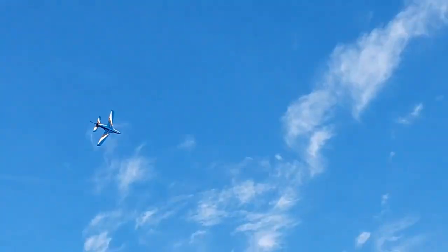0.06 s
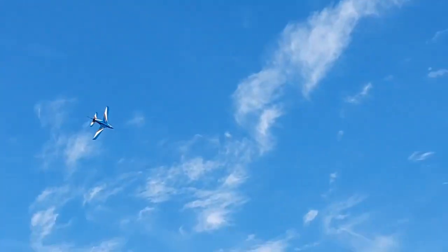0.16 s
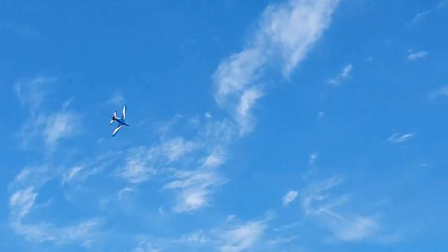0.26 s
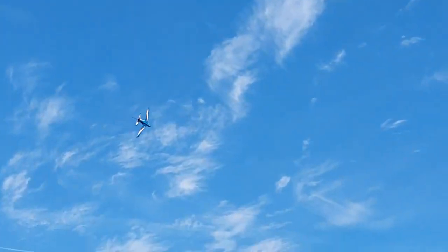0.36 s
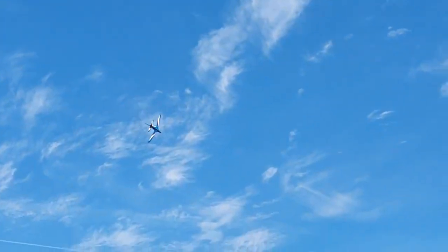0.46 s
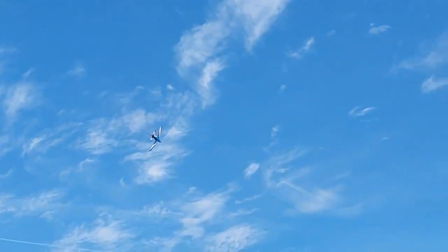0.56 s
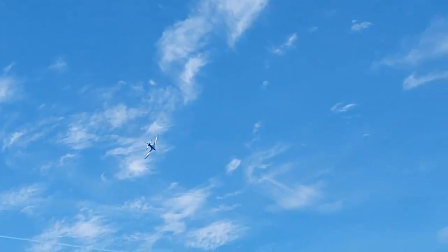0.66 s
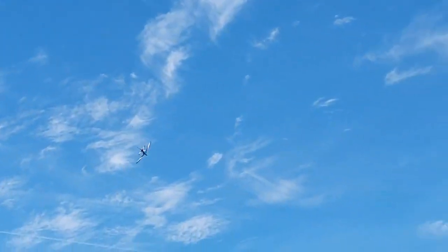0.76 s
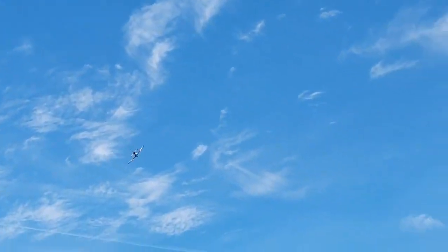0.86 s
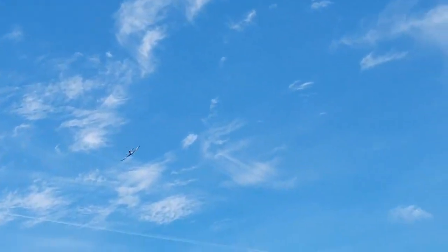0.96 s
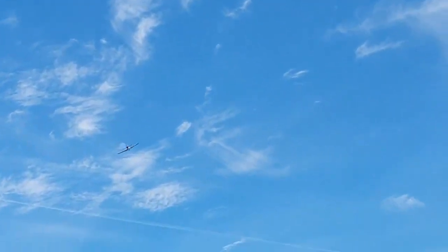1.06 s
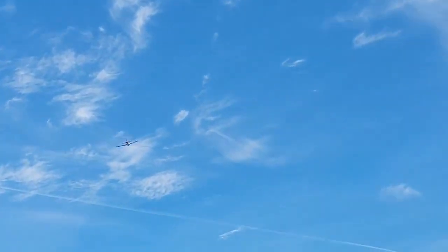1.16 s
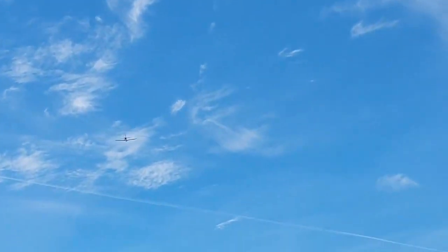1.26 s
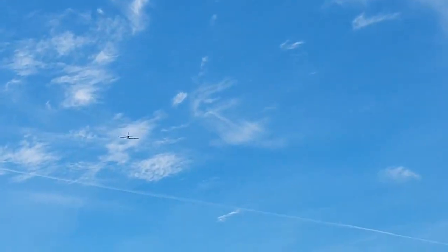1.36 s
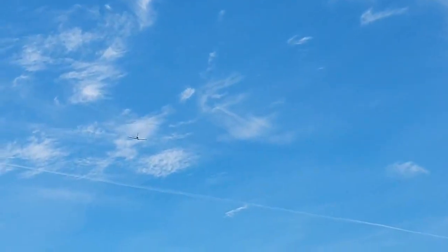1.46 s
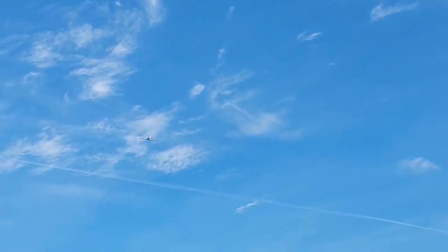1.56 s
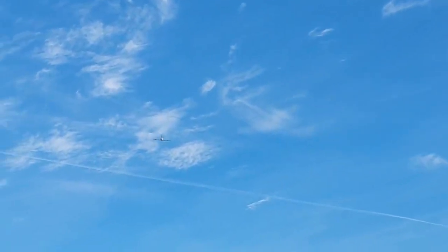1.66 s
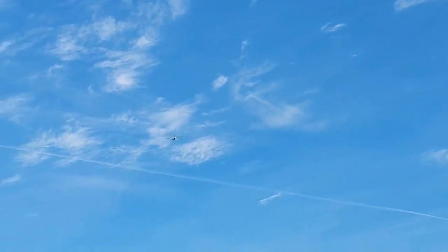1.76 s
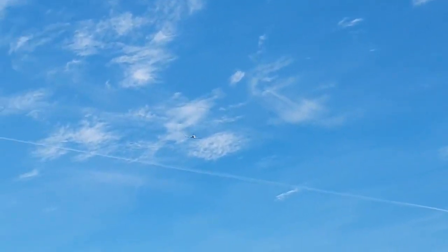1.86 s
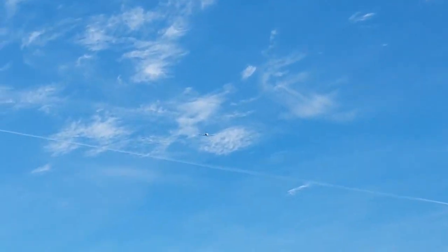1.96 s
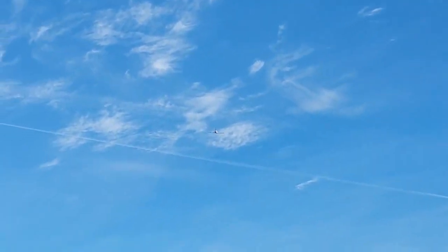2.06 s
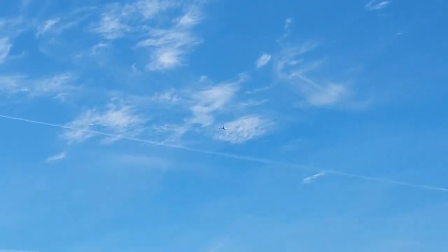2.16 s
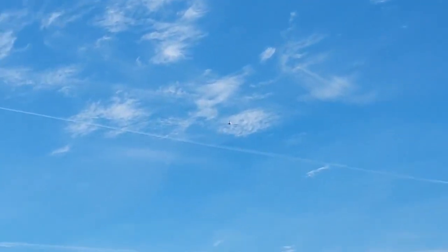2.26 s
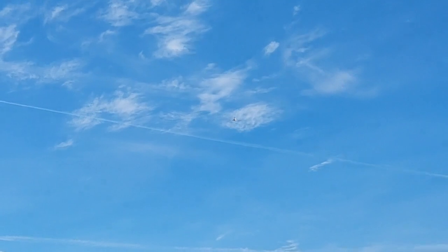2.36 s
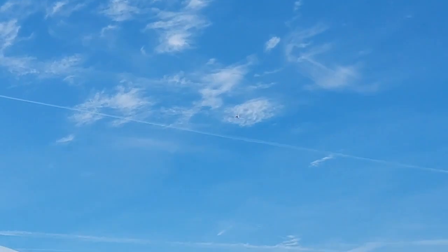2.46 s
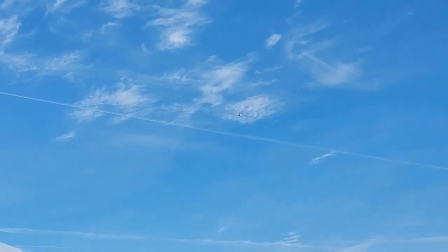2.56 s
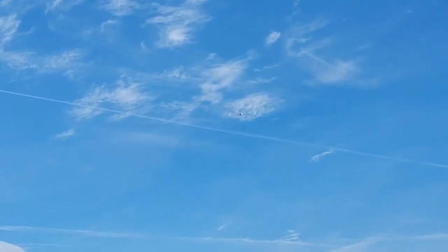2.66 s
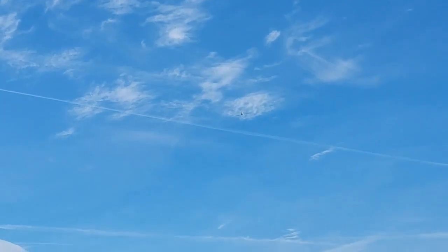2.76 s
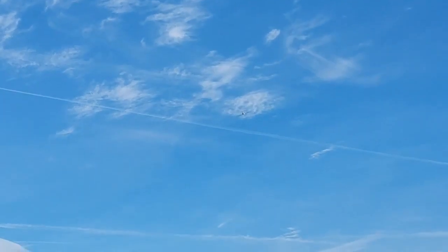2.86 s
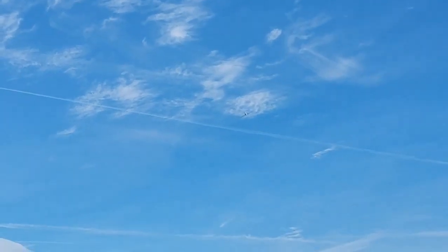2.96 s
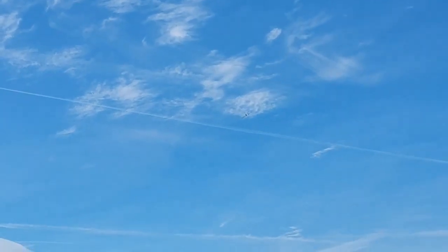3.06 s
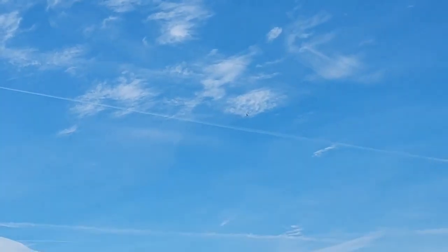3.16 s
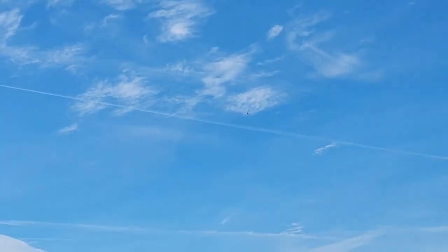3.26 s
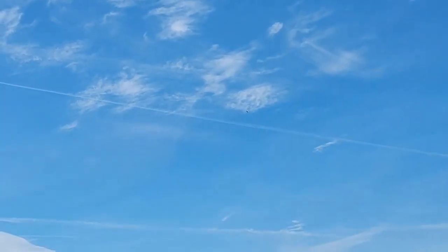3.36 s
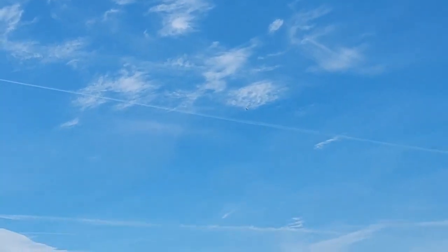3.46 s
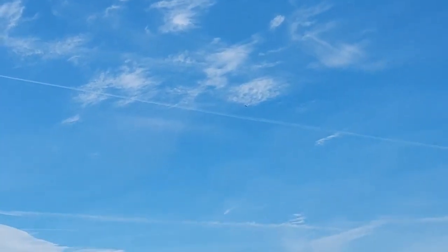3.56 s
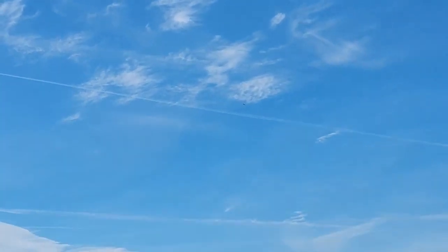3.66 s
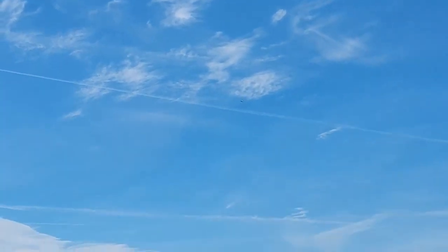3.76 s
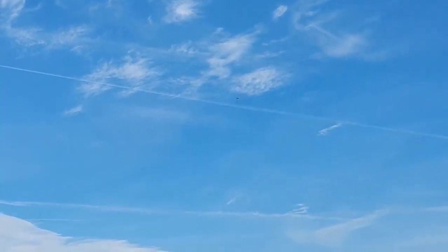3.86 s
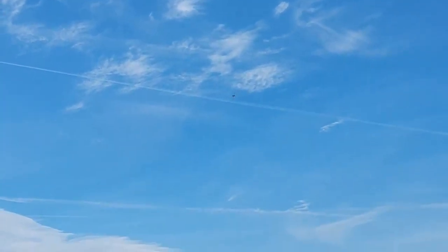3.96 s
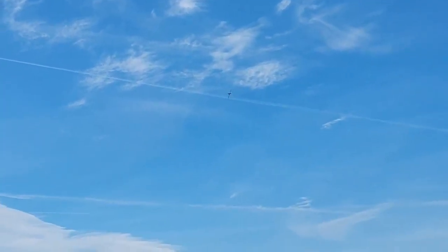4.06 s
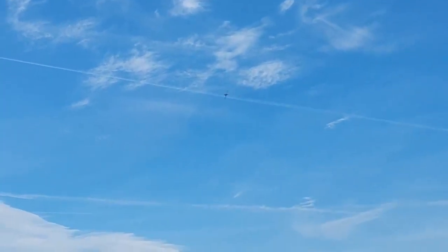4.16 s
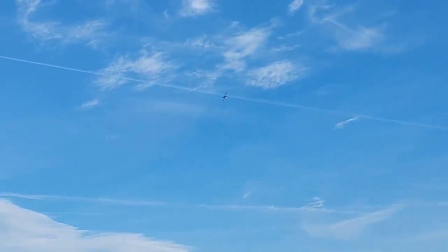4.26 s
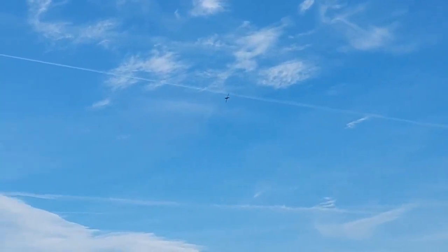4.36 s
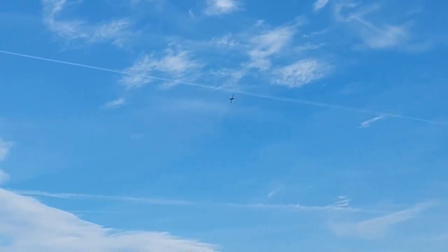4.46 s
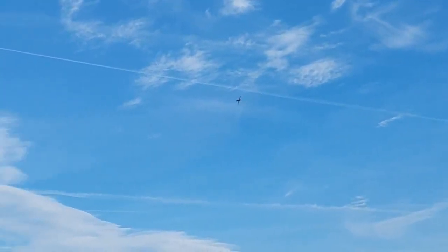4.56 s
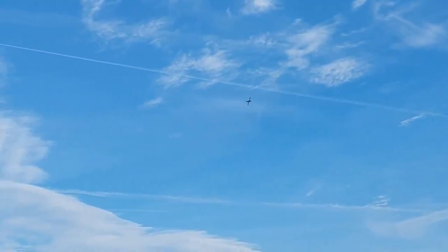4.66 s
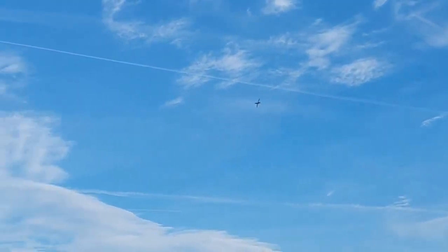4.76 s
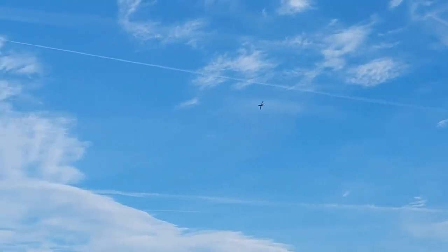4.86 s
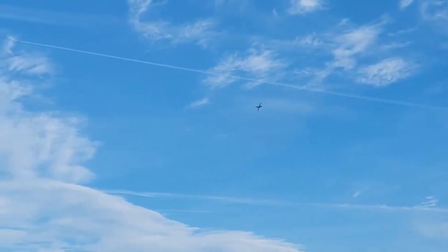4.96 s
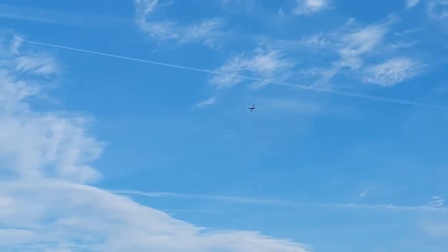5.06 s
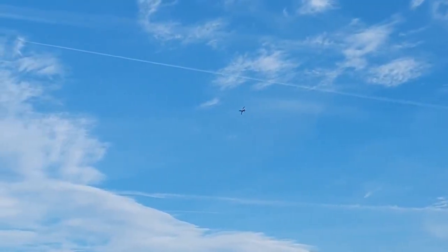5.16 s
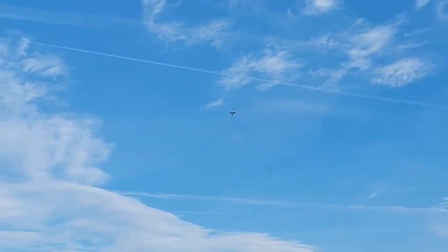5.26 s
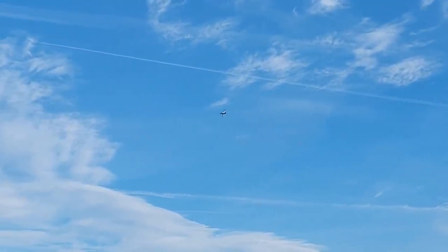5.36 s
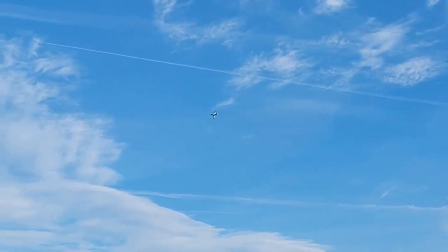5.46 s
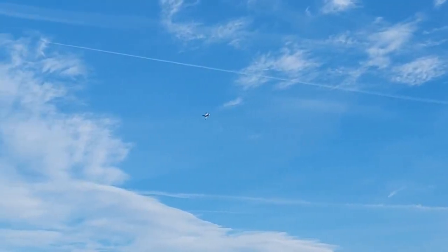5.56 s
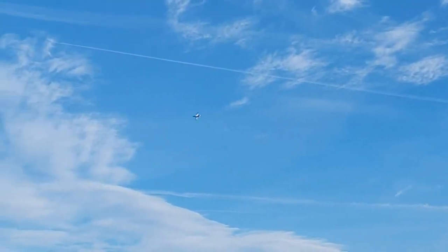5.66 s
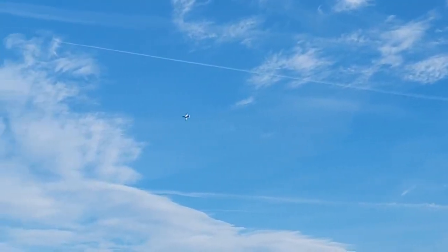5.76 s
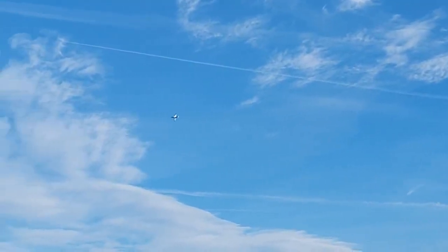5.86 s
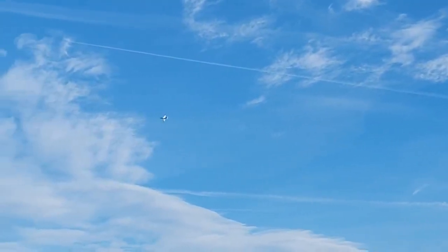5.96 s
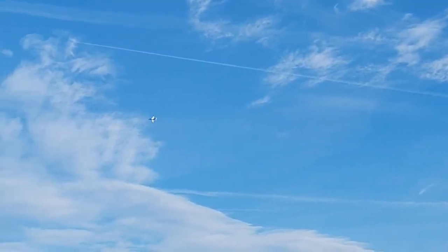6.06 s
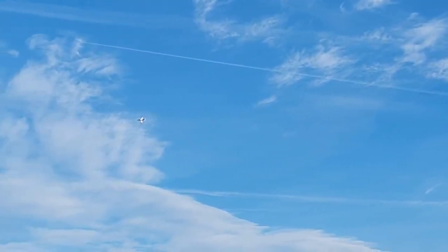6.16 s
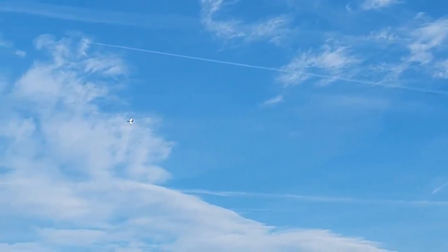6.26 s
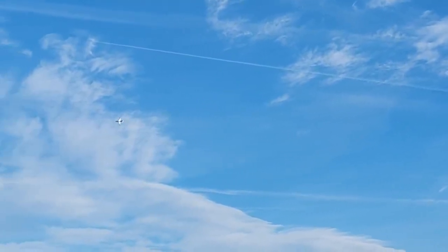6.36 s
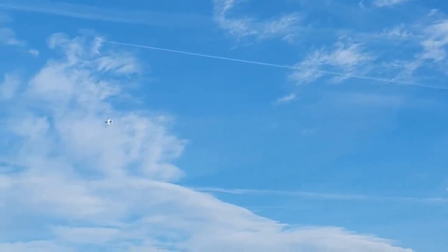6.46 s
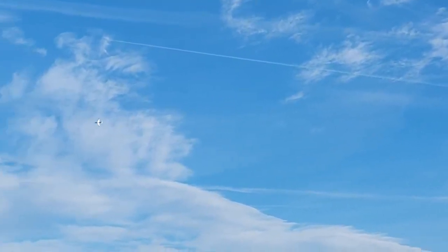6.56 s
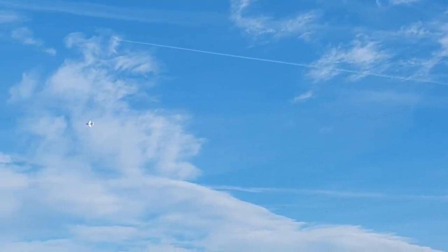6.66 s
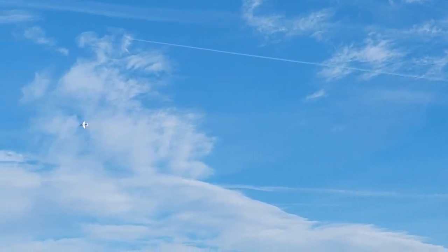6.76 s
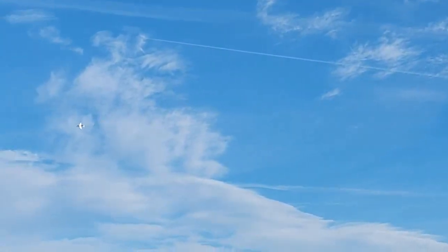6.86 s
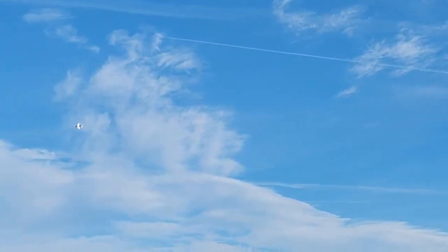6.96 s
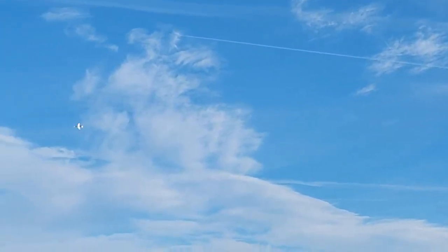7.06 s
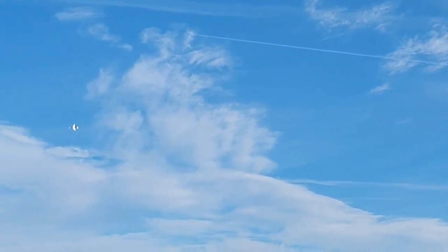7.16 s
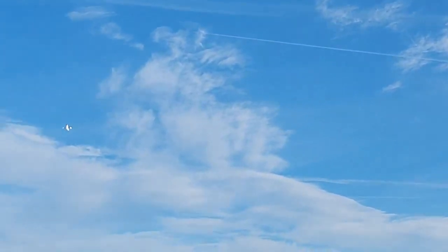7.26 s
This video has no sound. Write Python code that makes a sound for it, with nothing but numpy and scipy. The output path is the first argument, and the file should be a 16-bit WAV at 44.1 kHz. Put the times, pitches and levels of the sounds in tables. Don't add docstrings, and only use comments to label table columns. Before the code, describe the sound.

A handheld stereo microphone in a windy field follows a model jet flying away. Its rushing, breathy roar shrinks to a thin distant hiss, with a sliding hollow coloration from its ground reflection, then returns a little stronger and wavering. Low wind rumble and fluttering thuds dominate the first three seconds and die down. Soft cloth friction and several sharp clicks on the left close the scene.

```python
import sys
import numpy as np
from scipy import signal
from scipy.fft import next_fast_len
from scipy.io import wavfile
from scipy.ndimage import uniform_filter1d

SR = 44100
rng = np.random.default_rng(int(sys.argv[2]) if len(sys.argv) > 2 else 0)


def convert_level_to_amplitude(level_db):
    exponent = np.asarray(level_db, float) / 20
    return 10 ** exponent


def store_wav(level_fs):
    pcm = np.round(np.clip(np.atleast_2d(level_fs), -1, 1) * 32767)
    wavfile.write(sys.argv[1], SR, pcm.T.astype(np.int16))


N = 322573
HOP, SIZE = 256, 1024
HZ = np.fft.rfftfreq(SIZE, 1 / SR)[:, None]
T = np.arange(N // HOP + 5) * HOP / SR


def evened(x):
    return x / np.sqrt(np.mean(abs(x) ** 2) + 1e-20)


def read(points, hz=HZ):
    f, value = np.transpose(points)
    return np.interp(np.log(hz + 1), np.log(f + 1), value)


def columns(rows, t=T):
    s, *values = np.transpose(rows)
    return [np.interp(t, s, v) for v in values]


def static():
    real, imaginary = rng.standard_normal((len(T), len(HZ), 2, 2)).T
    return real + 1j * imaginary


def sounded(z):
    sound = signal.istft(z, nperseg=SIZE, noverlap=SIZE - HOP)[1]
    return sound[:, :N] / np.sqrt(SIZE / 3)


def blotches(bins, frames):
    field = rng.standard_normal((len(T), len(HZ))).T
    field = uniform_filter1d(field, int(bins), 0)
    return evened(uniform_filter1d(field, int(frames), 1))


def band_gain(shape_db, lo_hz, hi_hz):
    inside = (HZ[:, 0] > lo_hz) & (HZ[:, 0] < hi_hz)
    power = (convert_level_to_amplitude(shape_db[inside]) ** 2).sum(0) / len(HZ)
    return 1 / np.sqrt(power)


# time in seconds, roar in dB, nozzle pointing at the listener 0-1, range in metres.
FLIGHT = [(0, -23.5, 0, 45), (.1, -28, 0.21, 106), (.35, -30.5, 0.49, 86), (1.04, -37.5, 0.62, 118),
          (1.5, -39.5, 0.76, 178), (2, -38.5, 0.68, 180), (2.4, -42, 0.63, 184), (3.2, -40.5, 0.58, 178),
          (3.85, -44, 0.81, 226), (4.32, -47, 0.95, 210), (4.78, -40.5, 0.54, 286), (5.25, -39, 0.32, 280),
          (5.7, -39, 0.39, 260), (6.15, -41.5, 0.16, 235), (6.66, -38.5, 0.11, 250),
          (7.03, -46.5, 0.27, 240), (7.18, -39, 0.4, 240), (7.31, -38, 0.15, 350)]
# frequency in Hz, level in dB per Hz.
ROAR_COLOR = [(260, -13), (345, -6.5), (450, -11), (514, -7.5), (633, 0.5), (756, -3), (1780, -5),
              (1950, -7.5), (3130, -16.5), (3690, -18), (5030, -19.5), (6370, -21), (8570, -28),
              (10100, -36.5), (12800, -39), (15500, -53)]
# frequency in Hz, likeness 0-1.
PORT_LIKENESS = [(400, .9), (700, .97), (1400, .93), (2400, .92), (3200, .88), (3900, .75), (5000, .85),
                 (6500, .75), (12000, .7)]
# frequency in Hz, lead of the left in rad.
PORT_LEAD = [(600, 0), (1700, .6), (2500, -.65), (2900, -.25), (3600, -.9), (4200, -2), (6000, -2.4),
             (9000, -3)]
# frequency in Hz, left minus right in dB.
PORT_BALANCE = [(60, -9), (130, 5), (290, 0.5), (640, -1.0), (1410, -2.5), (3100, 2), (6820, 3.5),
                (15000, -2.5)]
# time in seconds, extra lead of the left port in ms.
BEARING_LEAD = [(0, 0.16), (1.25, 0.097), (1.6, 0.026), (3.5, -0.021), (4.3, 0.00015), (5.1, -0.089),
                (5.9, -0.043), (7.31, 0.019)]


def jet():
    roar_db, tail_on, range_m = columns(FLIGHT)
    lead_ms = columns(BEARING_LEAD)[0]

    knots = np.log([300, 650, 1400, 3800, 7500, 13000])
    tilt_db = np.array([-6 + 18 * tail_on,
                        -8 + 16.5 * tail_on,
                        0 * T,
                        7 - 10.5 * tail_on - 0.0292 * range_m,
                        13 - 0.1 * range_m,
                        15.5 - 0.12 * range_m])
    log_hz = np.log(HZ[:, 0] + 1)
    weights = np.array([np.interp(log_hz, knots, row) for row in np.eye(len(knots))]).T
    shape_db = read([(20, -50.5), (200, -20.5)] + ROAR_COLOR) + weights @ tilt_db

    stir_rad = 0.7 * blotches(20, 60) * np.minimum(HZ / 4000, 1)
    flicker_db = 1.05 * blotches(30, 12)
    flicker_db = flicker_db + 1.1 * blotches(300, 3.4) * np.minimum(HZ / 6000, 1.5)

    shared, separate = static()
    same = np.clip(read(PORT_LIKENESS), 0, 1)
    lag_rad = read(PORT_LEAD) + 2 * np.pi * HZ * lead_ms * 0.00076 + stir_rad
    right = (same * shared + np.sqrt(1 - same ** 2) * separate) * np.exp(-1j * lag_rad)
    balance = convert_level_to_amplitude(read(PORT_BALANCE) / 2)
    ports = np.array([shared * balance, right / balance])

    size = convert_level_to_amplitude(shape_db + roar_db + flicker_db + focus() - 2) * band_gain(shape_db, 900, 1766)
    overhead = np.clip((echo_ms(T) - 2.5) / 0.41, 0, 1)
    direct = sounded(ports * size * case(overhead))
    return direct + grass(direct)


# time in seconds, length in seconds, frequency in Hz, lift in dB.
WARM_EDDIES = [(1.566, 0.073, 7000, 9), (1.68, 0.24, 4300, 6), (3.1, 0.32, 3300, 2.5),
               (4.5, 0.14, 3700, 4.5), (5.1, .2, 2600, 5.5), (5.16, 0.19, 4500, 8), (2.15, 0.093, 4000, 1),
               (3.55, .15, 4000, 2.5), (6.95, 0.24, 3300, 5.5), (5.8, 0.16, 2600, 4),
               (5.56, 0.061, 7500, 5), (5.64, 0.05, 1530, 5), (6.7, 0.028, 2000, 7), (4.2, .3, 4200, 3),
               (6.1, .07, 1350, 3.5), (2.82, .2, 4400, 3.5), (5.87, 0.055, 4400, 8.5),
               (6.197, 0.16, 4500, 3), (6.33, 0.028, 1420, 1.5), (6.739, .06, 3100, 9.5),
               (6.75, .07, 5900, 9), (7.28, 0.045, 3100, 10.5)]


def focus():
    s, length, hz, db = np.transpose(WARM_EDDIES)
    bands = np.exp(-(np.log2((HZ + 1) / hz) / 0.39) ** 2)
    moments = np.exp(-((T[:, None] - s) / length) ** 2)
    return db * bands @ moments.T


# frequency in Hz, width in Hz, left and right in dB with
# the jet overhead, left and right in dB with it at the horizon.
BODY_SCATTER = [(1730, 310, 0.5, 2.5, 3, 3.5), (2480, 110, -2.5, -1, -3.5, 0),
                (2864, 113, 0.5, 0, -6, -6.5), (3180, 120, 7, 4.5, 2, 0.5), (3550, 200, -7, -0.5, -3.5, -2),
                (4410, 74, -9, 4, -5, 5.5), (5160, 240, 3, 3, 4, 3.5), (6460, 370, -4, -15, 1, -5),
                (7660, 380, -.5, -4, 1.5, -4), (8060, 160, 1, -7, 1.5, 0), (9000, 220, 1, -9, -6.5, -5),
                (10940, 340, 6.5, -5, 2, 5.5), (14200, 200, -6, -9, -3, 0), (14800, 400, 1, 8.5, -2, 0)]


def case(overhead):
    hz, width, *db = np.transpose(BODY_SCATTER)
    bumps = np.exp(-((HZ - hz) / width) ** 2)
    shapes_db = (np.array(db) @ bumps.T)[..., None]
    return convert_level_to_amplitude(shapes_db[:2] * overhead + shapes_db[2:] * (1 - overhead))


GROUND_TURN = np.array([[2.15], [1.8]])


def grass(direct):
    n = np.arange(N)
    delay_ms = echo_ms(n / SR)
    grazing, steep = 0.66, 0.42
    echo = grazing + (steep - grazing) * np.clip((delay_ms - 3.5) / 0.99, 0, 1)
    analytic = signal.hilbert(direct, next_fast_len(N))[:, :N]
    turned = (analytic * np.exp(-1j * GROUND_TURN)).real
    scatter = signal.butter(1, 3800, fs=SR)
    dulled = 0.85 * signal.filtfilt(*scatter, turned) + 0.15 * turned
    late = np.array([np.interp(n - delay_ms * SR / 1000, n, x) for x in dulled])
    return np.clip(echo, 0, 0.9) * late


# time in seconds, angle above the horizon in degrees.
JET_ANGLE = [(0, 33), (.3, 29.6), (.8, 24.3), (1.15, 21.8), (1.5, 20), (1.85, 18.7), (2.2, 17.7), (2.9, 17),
             (3.6, 16.05), (4.3, 15.35), (4.9, 15.45), (5.8, 15.05), (6.3, 14.6), (6.8, 14.75),
             (7.31, 14.7)]


def echo_ms(t):
    held_m, sound_m_s = 1.5, 343
    angle = np.radians(columns(JET_ANGLE, t)[0])
    return 2000 * held_m * np.sin(angle) / sound_m_s


# time in seconds, frequency in Hz, level in dB.
WHINE_GLIDE = [
    (0.9, 10440, -74),
    (1.586, 10755, -84),
    (1.902, 10847, -84),
    (1.964, 10853, -135),
    (2.066, 10700, -83),
    (2.3, 10900, -98),
]


def whine():
    t = np.arange(N) / SR
    hz, level_db = columns(WHINE_GLIDE, t)
    shiver = evened(uniform_filter1d(rng.standard_normal((3, N)), 900))
    inside = uniform_filter1d(1. * (t > WHINE_GLIDE[0][0]) * (t < WHINE_GLIDE[-1][0]), 4000)
    tone = np.sin(2 * np.pi * np.cumsum(hz + 25 * shiver[2]) / SR)
    return inside * convert_level_to_amplitude(level_db + 5.5 + 3.26 * shiver[:2]) * tone


# time in seconds, level in dB, left minus right in dB.
WIND_LEVEL = [(0, -42.5, -8), (.35, -48, -9.5), (.51, -37, 0), (1.1, -39, -9), (1.36, -35, 3),
              (1.75, -36.5, 3.5), (2.18, -38.5, 2.5), (3.3, -38, -2.5), (3.46, -39, 2), (3.77, -51.5, -4.5),
              (4.5, -44.5, -1.5), (4.7, -44, 0.5), (5.3, -48.5, -1), (5.56, -41, 5), (5.75, -54, -10),
              (6.1, -55.5, -6.5), (6.9, -53.5, 10), (7.31, -48, 7)]
# frequency in Hz, level in dB per Hz.
WIND_COLOR = [(12, -46), (20, -33), (59, 7.5), (140, 4.5), (184, -9.5), (218, -4.5), (259, -0.5),
              (600, -18.5), (780, -64), (1320, -120)]


def wind():
    level_db, pan_db = columns(WIND_LEVEL)
    fresh_db, calm_tilt = -38, 0.32
    shape_db = read(WIND_COLOR + [(1200, -71)])
    shape_db = shape_db + calm_tilt * (level_db - fresh_db) * np.log2((HZ + 20) / 100)
    lulls_db = 6.4 * np.minimum(blotches(40, 7), 0.6) * np.clip(1.5 - HZ / 400, 0.4, 1)
    side_db = np.array([pan_db, -pan_db])[:, None] / 2
    shared, separate = static()
    same = -0.6 / (1 + (HZ / 90) ** 2)
    ports = np.array([shared, same * shared + np.sqrt(1 - same ** 2) * separate])
    size = convert_level_to_amplitude(shape_db + level_db + lulls_db + side_db + 4.5) * band_gain(shape_db, 45, 330)
    return sounded(ports * size)


# time in seconds, level in dB, left
# minus right in dB, rate in Hz.
WIND_EDDIES = [(.04, -17, 4, 125), (.087, -15, 3, 110), (.461, -20.5, -6, 154), (.567, -13.5, 21, 260),
               (.73, -16, 1.5, 203), (.852, -18, -10, 115), (.979, -12, -6.5, 146),
               (1.024, -7.5, 5.5, 153.5), (1.057, -14, 12, 148), (1.11, -17.5, -3, 157), (1.18, -15, 1, 166),
               (1.212, -12, 4, 138), (1.258, -13, 0, 145), (1.292, -18, 0, 131), (1.353, -16.5, -8, 175),
               (1.39, -16.5, -1, 144), (1.464, -15.5, -8, 168), (1.567, -14.5, -4, 129),
               (1.674, -17, -9, 130), (1.906, -15.5, 12, 135), (1.977, -11, -3, 115), (2.045, -18.5, 2, 151),
               (2.18, -10, -3.5, 132), (2.24, -13, 2, 160), (2.281, -8.5, -3.5, 140), (2.485, -18, 0, 141),
               (2.562, -16.5, -1, 107), (2.674, -14, 7, 128), (2.76, -16.5, -3, 147),
               (2.875, -13.5, -2, 129),
               (2.929, -20, -1, 183), (3.038, -12, 2.5, 136), (3.133, -18.5, -1, 154.5),
              (3.24, -17.5, 0.5, 149.6), (3.392, -20, -5.5, 107), (3.449, -23, -3, 118),
              (3.494, -16.5, 3, 205), (3.567, -30, 0, 163), (3.692, -30, 1, 101), (4.014, -20.5, 2, 139),
              (4.136, -27, 2, 97), (4.181, -24, -7, 174.5), (4.259, -15, -3, 155), (4.325, -19, -4, 143),
              (4.363, -19.5, -3.5, 161), (4.806, -23.5, 2, 125), (5.455, -18.5, -0.5, 130),
              (5.508, -25, 3, 151), (5.57, -20.5, -5, 106), (5.624, -23.5, -3, 116),
              (5.688, -21.5, -1.5, 88.5), (5.72, -27.5, 4, 113), (6.25, -36, 10, 107),
              (6.326, -27.5, 1, 113), (6.381, -33, -2, 92), (6.6, -34.5, 5, 115), (6.98, -38, 7, 110),
              (7.128, -23.5, 22, 106), (7.238, -25, 2, 103), (7.296, -32, -16, 124)]


def buffets(rows):
    half = 4000
    out = np.zeros((2, N + SR))
    t = np.arange(-half, half) / SR
    spread = np.array([[0.45], [0.75], [1.05], [1.5], [2.2]])
    share = np.array([0.61, 1.0, 0.99, 0.75, 0.5])
    all_phases = rng.random((len(rows), 2, len(share), 1))
    for (s, db, pan_db, hz), phases in zip(rows, all_phases):
        length_ms = 12.7 + 0.88 * max(-10 - db, 0)
        hump = np.exp(-(t / (0.00068 * length_ms)) ** 2)
        push = hump * (share @ np.cos(2 * np.pi * (hz * spread * t + phases)))
        push *= np.linalg.norm(hump) / np.linalg.norm(push, axis=1, keepdims=True)
        ports = convert_level_to_amplitude(db - 7 + np.minimum([[pan_db], [-pan_db]], 0))
        out[:, round(s * SR):][:, :len(t)] += ports * push
    return out[:, half:][:, :N]


# start in seconds, length in seconds, peak in dB, left minus right in dB.
RUBS = [
    (5.399, 0.89, -63, -12),
    (7.103, 0.22, -76, 14),
]
# frequency in Hz, level in dB per Hz.
CLOTH_COLOR = [(3000, -29), (6000, -15), (8500, 1), (10300, -11.5), (11300, -3), (15000, -1.5), (15700, -1)]


def cloth():
    t = np.arange(N) / SR
    out = np.zeros((2, N))
    shape_db = read(CLOTH_COLOR)
    side_db = 7 * np.array([[[1]], [[-1]]]) * np.clip((11000 - HZ) / 1500, 0, 1)
    fizz = sounded(static() * convert_level_to_amplitude(shape_db + side_db) * band_gain(shape_db, 11000, 15000))
    sparks = rng.exponential(1, N) * (rng.random(N) < 300 / SR)
    snaps = 1 + 6 * uniform_filter1d(sparks, 40)
    peak, start_db, end_db = 0.2, -28, -21
    for s, length, db, pan_db in RUBS:
        u = np.clip((t - s) / length, 0, 1)
        rise_db = start_db * np.maximum(1 - u / peak, 0) ** 2
        fall_db = end_db * np.maximum(u - peak, 0) / (1 - peak)
        inside = uniform_filter1d(1. * (u > 0) * (u < 1), 900)
        ports = convert_level_to_amplitude(db + rise_db + fall_db + np.array([[pan_db], [-pan_db]]) / 2)
        out += inside * ports * fizz * snaps
    return out


# time in seconds, peak in dB, left minus right in dB, knock in dB.
GRIP_TICKS = [
    (7.1312, -54, 5, -32),
    (7.1487, -44, 13, -33),
    (7.1564, -56, 7.5, -35),
    (7.1825, -37, 25, -25),
    (7.226, -54, 16, -37),
    (7.2337, -48, 9.5, -39),
    (7.2399, -39.5, 17, -41),
]


def grip():
    out = np.zeros((2, N + SR))
    t = np.arange(200) / SR
    cracks = rng.standard_normal((len(GRIP_TICKS), 201))
    for (s, db, pan_db, knock_db), crack in zip(GRIP_TICKS, cracks):
        grit = 0.3 * np.diff(crack) + 3 * (np.arange(200) == 50)
        snap = convert_level_to_amplitude(db + 10) * grit * np.exp(-abs(t - 0.001) / 0.00028)
        cycle = np.sin(2 * np.pi * 1300 * (0.0012 - t)) * np.exp(-((t - 0.0012) / 0.00016) ** 2)
        knock = convert_level_to_amplitude(knock_db + 14.5) * cycle
        out[:, round(s * SR):][:, :200] += (snap + knock) * convert_level_to_amplitude(np.array([[0], [-pan_db]]))
    return out[:, :N]


# frequency in Hz, level in dB per Hz.
HISS_COLOR = [(6000, -12.5), (8500, -5), (9700, -8), (11500, -3), (15500, -1)]


def self_noise():
    specks = blotches(5, 6) + 0.6 * blotches(400, 5) > 0.7
    hiss = static() * convert_level_to_amplitude(read([(3000, -40)] + HISS_COLOR)) * specks
    return convert_level_to_amplitude(-77.5) * evened(sounded(hiss))


# frequency in Hz, level in dB a bin.
TREBLE_FLOOR = [(6200, -125), (7600, -103), (8800, -96), (10500, -95), (12000, -101), (15000, -100)]


def thinned(x):
    hz, _, z = signal.stft(x, SR, nperseg=2048)
    hz = hz[:, None]
    power = abs(z) ** 2
    bands = np.add.reduceat(power.mean(0), np.arange(0, len(hz), 32)) / 32
    band_db = 10 * np.log10(bands + 1e-20) + 2.2 * rng.standard_normal(bands.shape)
    block = np.repeat(band_db, 32, 0)[:len(hz)] > read(TREBLE_FLOOR, hz)
    around = uniform_filter1d(power, 32, 1)
    single = power > 0.25 * np.minimum(hz / 6000, 1.5) * around
    return signal.istft(z * block * single, SR, nperseg=2048)[1][:, :N]


def scene():
    air = wind() + buffets(WIND_EDDIES)
    return jet() + whine() + air + cloth() + grip()


def low_pass(x):
    return signal.sosfilt(signal.butter(12, 16370, fs=SR, output="sos"), x)


def record(dry):
    edge = signal.firwin(301, 15750, window=("kaiser", 9), fs=SR)
    mix = signal.oaconvolve(thinned(dry) + self_noise(), edge[None], "same")
    return low_pass(mix)


dry = scene()
out = record(dry)
store_wav(out)
```